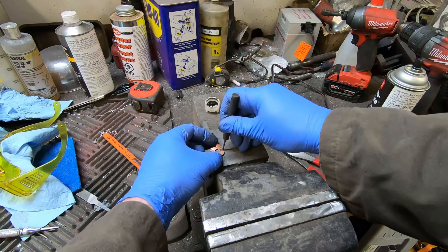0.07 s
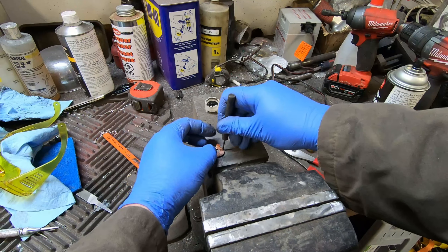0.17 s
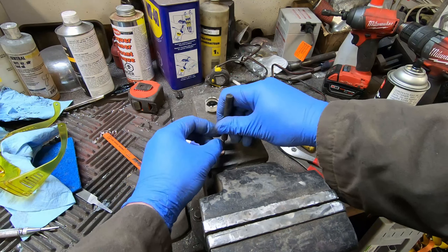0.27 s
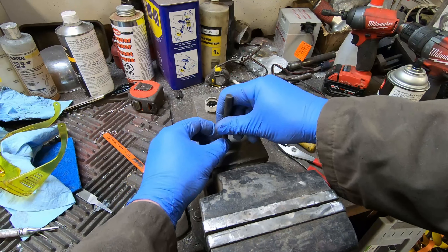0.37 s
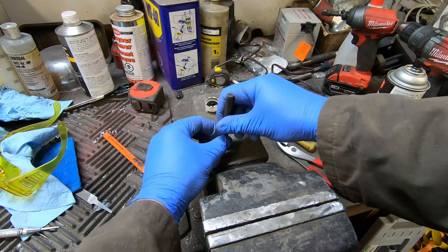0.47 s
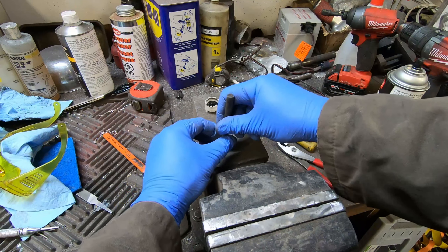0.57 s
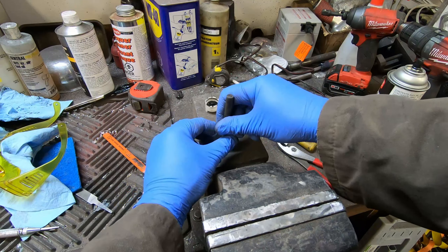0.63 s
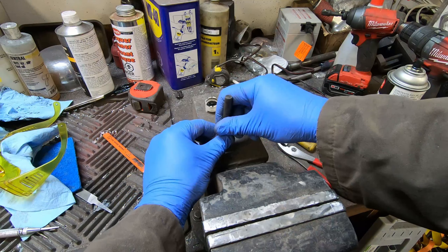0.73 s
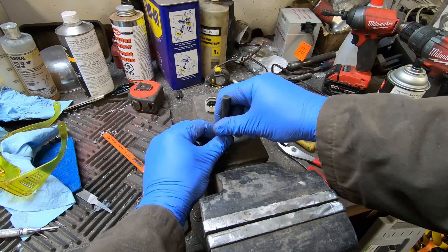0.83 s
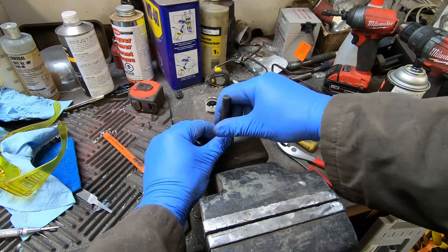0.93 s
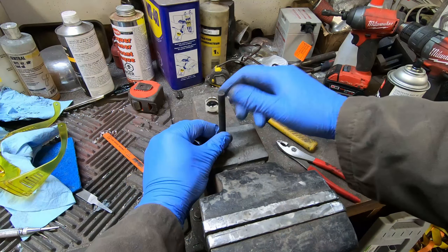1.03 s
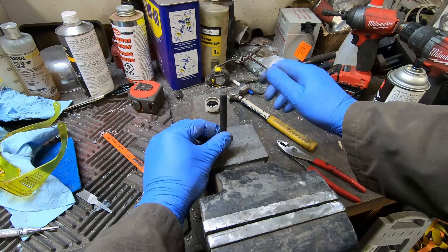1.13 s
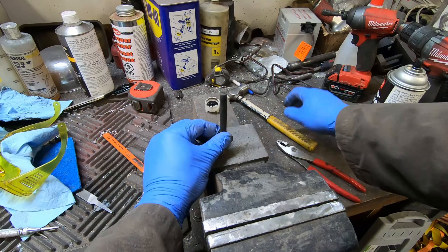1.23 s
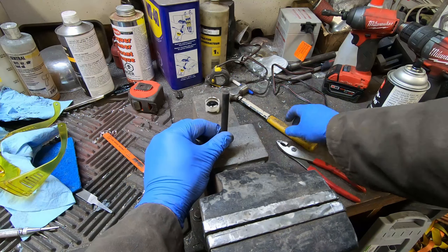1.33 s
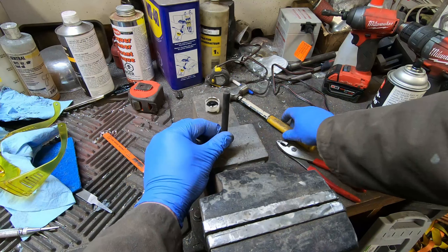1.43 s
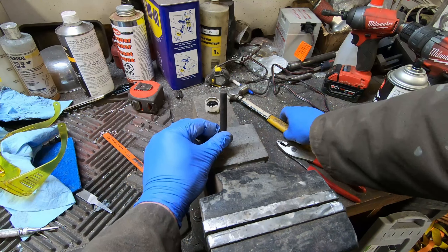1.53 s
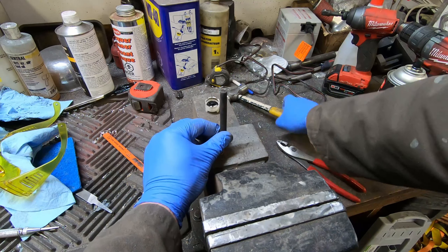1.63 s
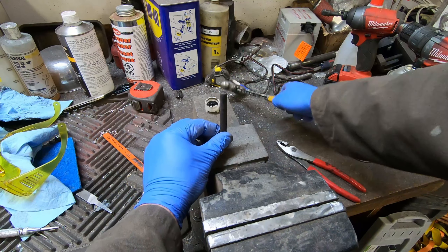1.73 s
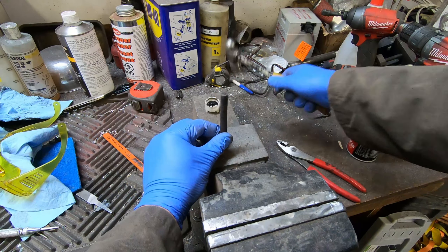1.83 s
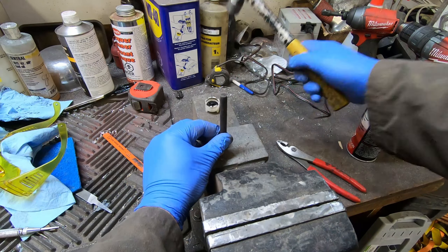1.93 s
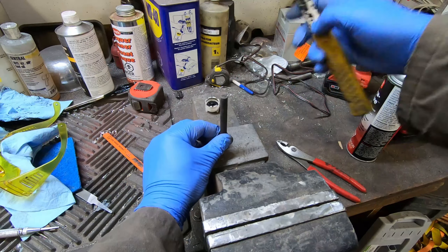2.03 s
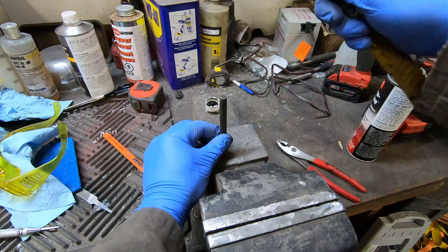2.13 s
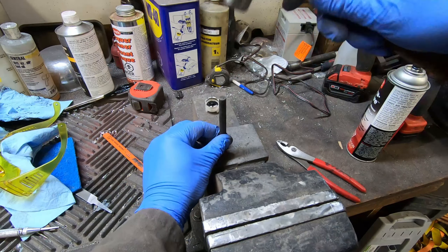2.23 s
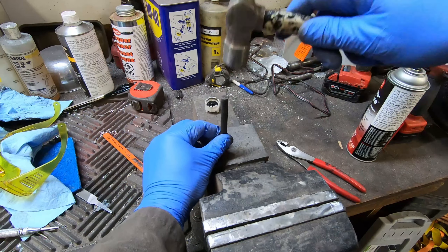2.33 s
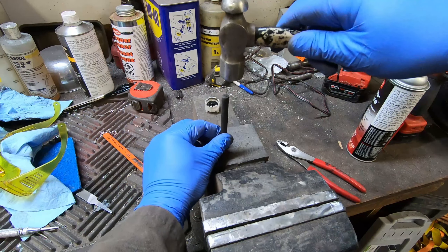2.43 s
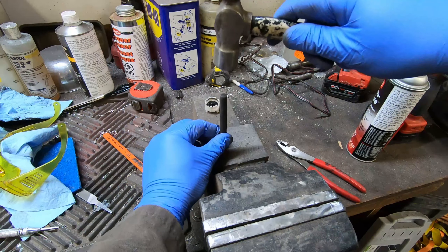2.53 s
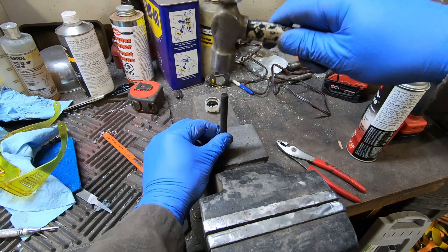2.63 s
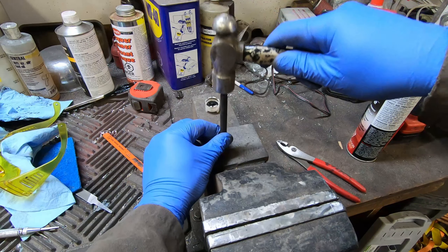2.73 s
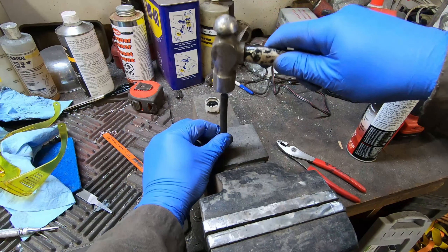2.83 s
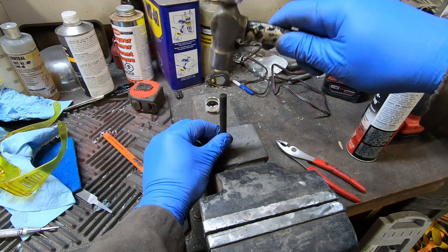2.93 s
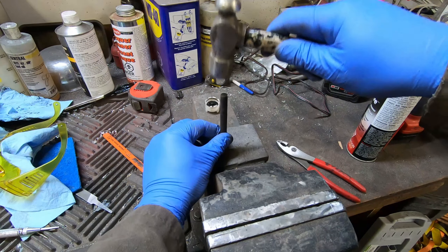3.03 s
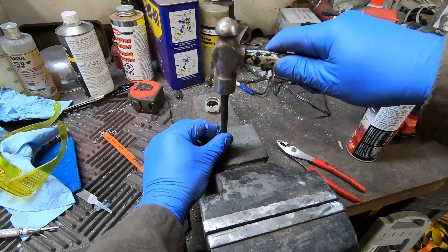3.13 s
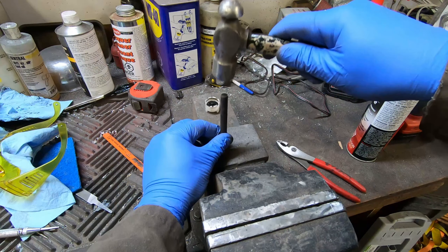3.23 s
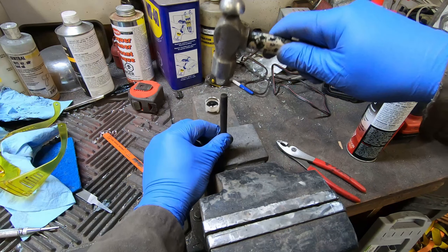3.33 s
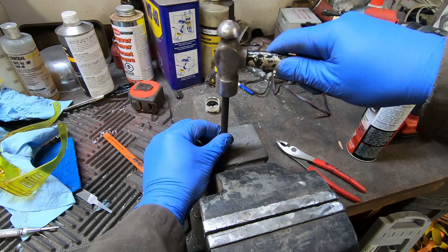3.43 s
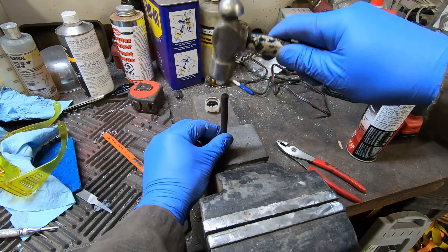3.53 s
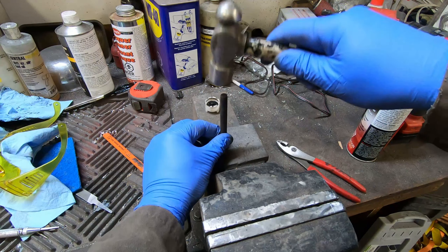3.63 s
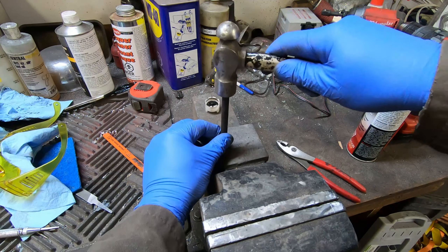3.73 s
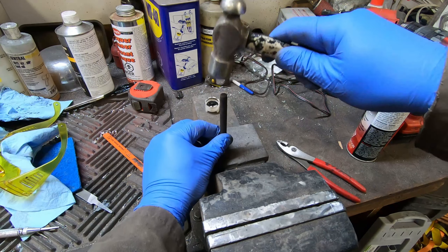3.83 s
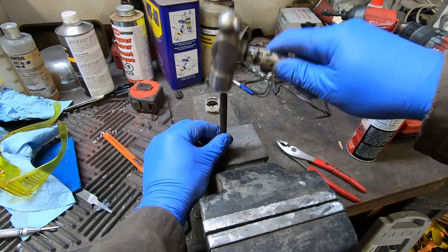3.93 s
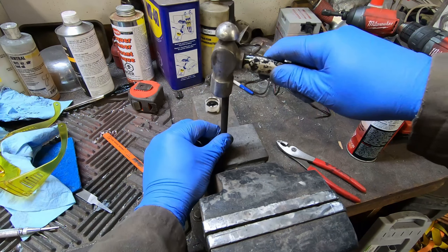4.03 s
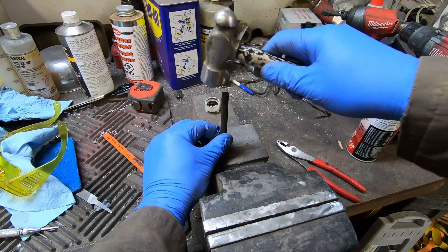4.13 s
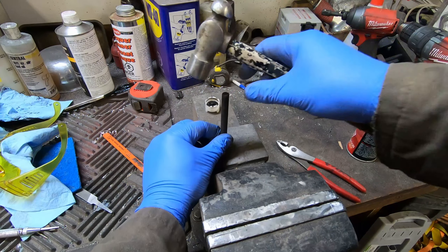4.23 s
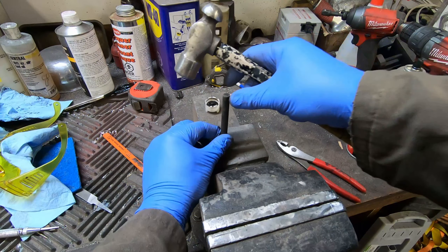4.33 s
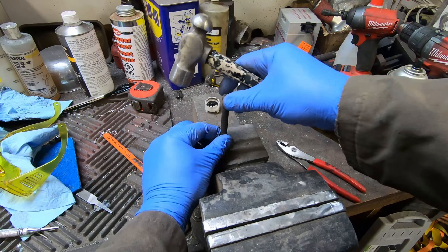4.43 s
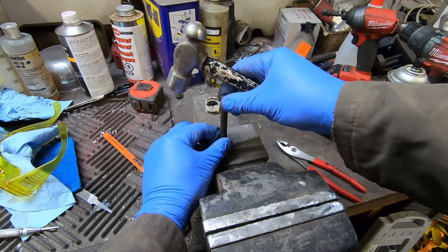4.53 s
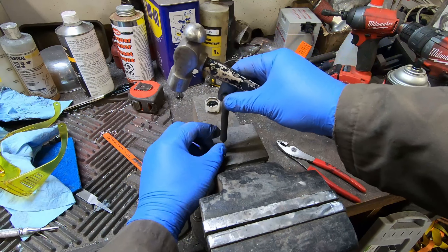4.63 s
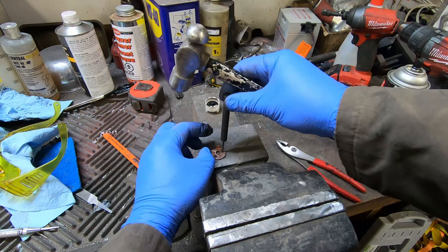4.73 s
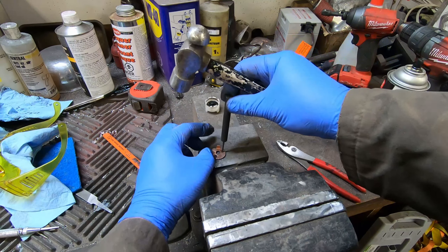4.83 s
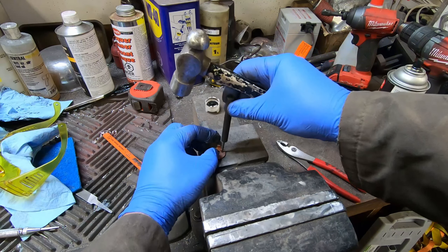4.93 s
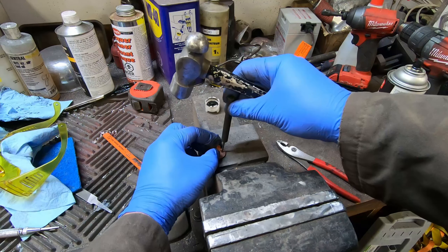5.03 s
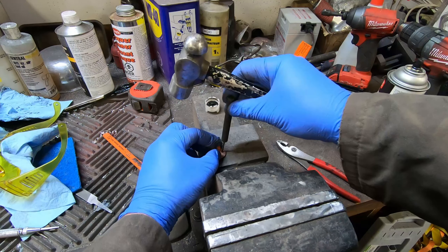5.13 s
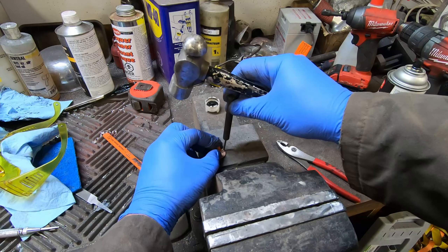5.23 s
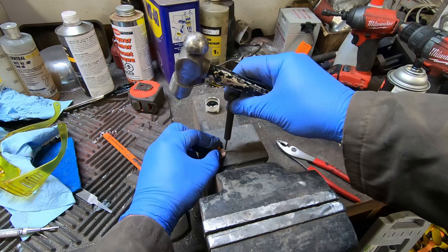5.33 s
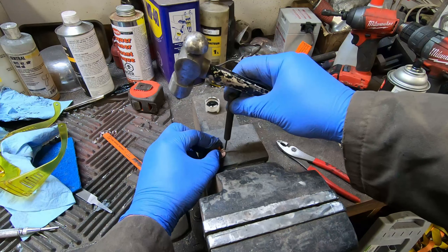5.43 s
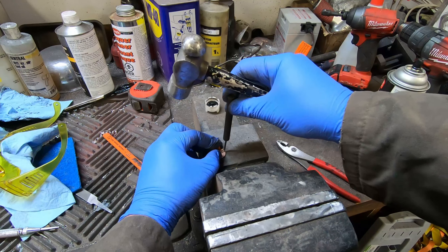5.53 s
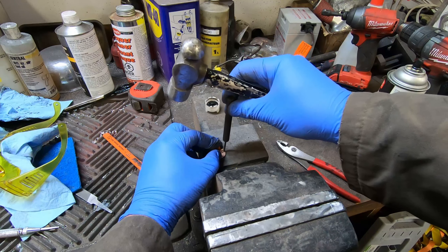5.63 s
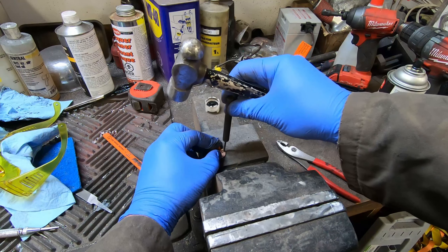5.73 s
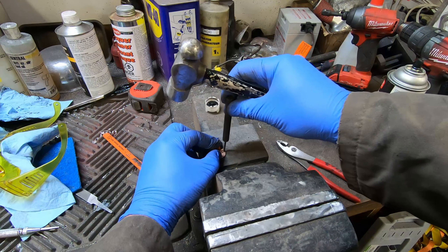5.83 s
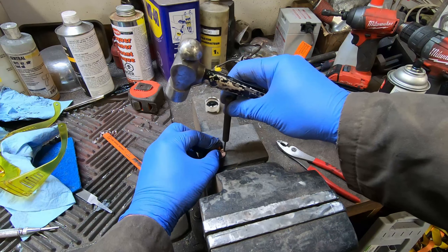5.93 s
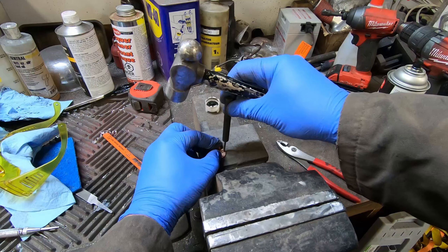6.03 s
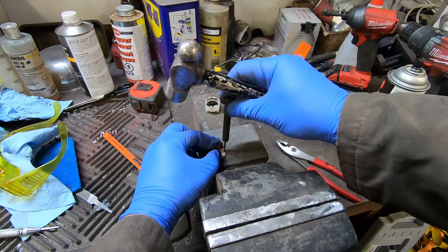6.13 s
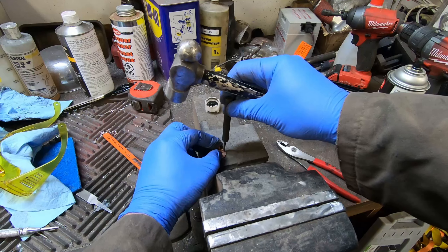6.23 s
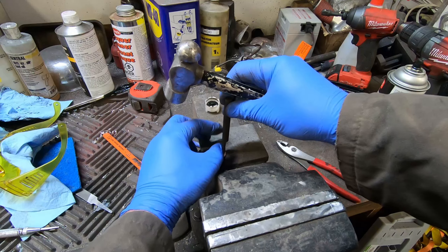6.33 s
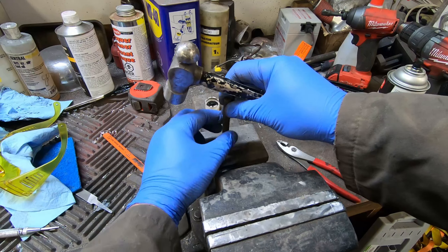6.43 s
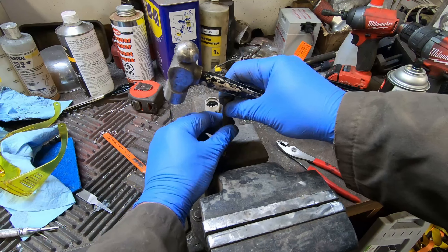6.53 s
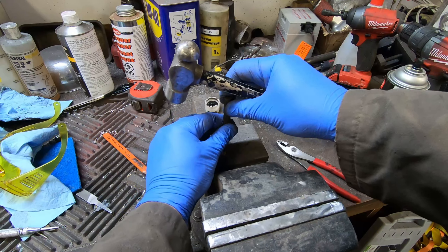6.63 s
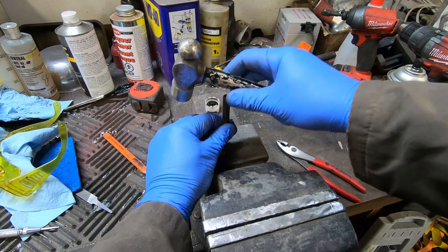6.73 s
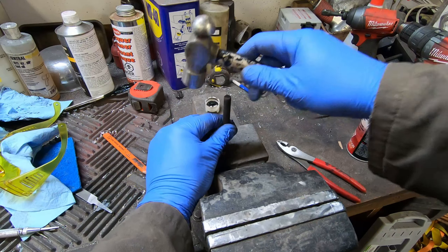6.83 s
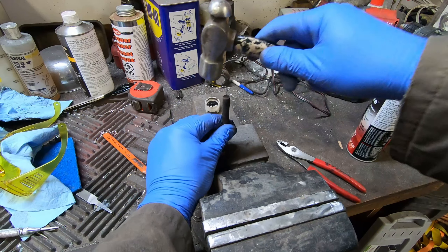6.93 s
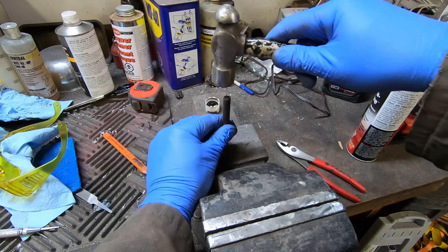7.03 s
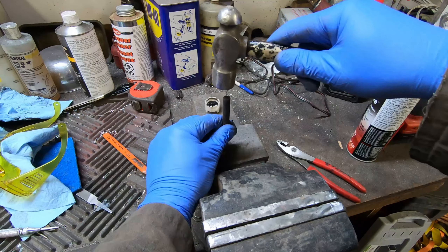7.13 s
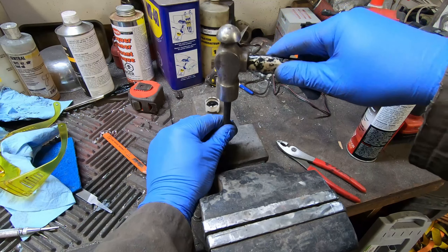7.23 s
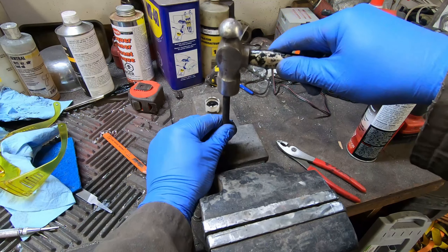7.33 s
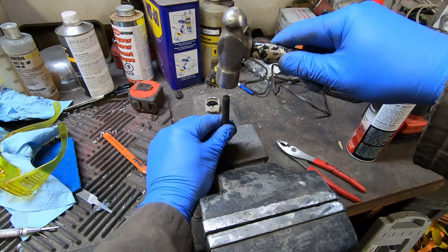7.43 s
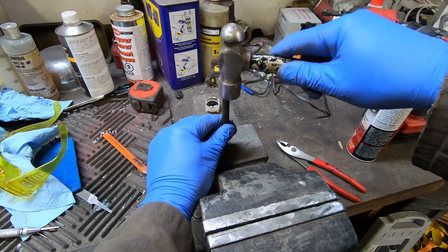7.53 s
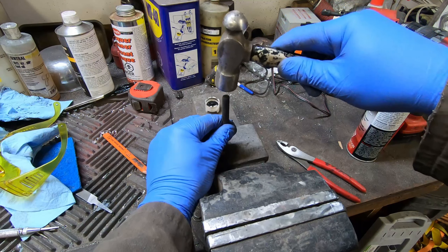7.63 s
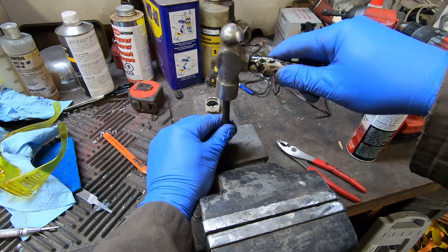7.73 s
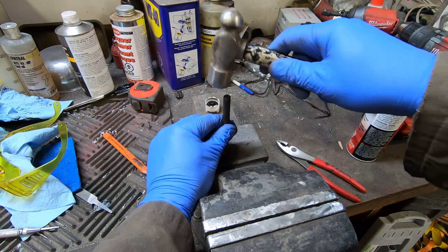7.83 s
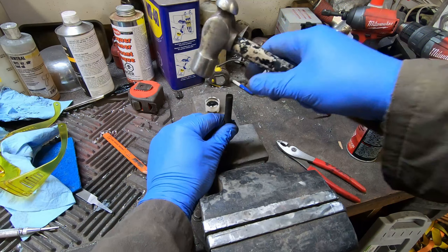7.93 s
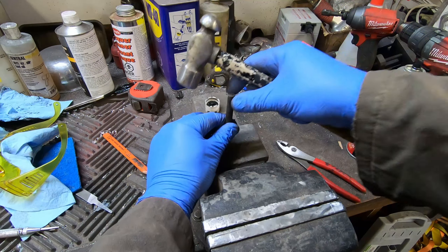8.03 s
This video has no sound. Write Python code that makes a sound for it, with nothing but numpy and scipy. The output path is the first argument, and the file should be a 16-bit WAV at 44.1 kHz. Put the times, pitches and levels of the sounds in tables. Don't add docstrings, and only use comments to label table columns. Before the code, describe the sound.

A close, mono workshop scene with low, quiet room tone and a barely audible high charger whine. From 0 to 1.5 seconds, small steel ticks, soft taps, rustling sleeves and a low murmur of arms on the bench. Around 1.6 to 1.9 a hammer drags off the bench, a short stuttering rumble with gritty hiss and catches; at 2.0 to 2.25 the handle slides faintly through a rubber glove. A light tap at 2.9 is followed by heavy blows at 3.2, 3.5, 3.8 and 4.1, the last with a tiny high rebound. Each is a bright steel crack with a solid bench thump, under a second of room answer and a faint distant sheet-metal hum. From 4.3 to 7.0, only fading hum, delicate clicks, dull touches and cloth rustle. Three more hard strikes land at 7.35, 7.6 and 7.85, ringing into the end.

```python
import sys
import numpy as np
from scipy import signal
from scipy.fft import rfft, irfft, next_fast_len
from scipy.io import wavfile
from scipy.ndimage import map_coordinates

SR = 44100
rng = np.random.default_rng(int(sys.argv[2]) if len(sys.argv) > 2 else 0)


def generate_wav(sig):
    pcm = np.round(np.clip(np.atleast_2d(sig).T, -1, 1) * 32767).astype(np.int16)
    wavfile.write(sys.argv[1], SR, pcm)


def attenuation_scalar(level_db):
    decades = np.asarray(level_db, float) / 20
    return 10 ** decades


N = 357165


def unit(x):
    return x / np.sqrt(np.mean(x ** 2) + 1e-20)


def add(track, s, x):
    part = track[round(s * SR):][:len(x)]
    part += x[:len(part)]


def along(points, hz):
    f, v = np.transpose(points)
    return np.interp(np.log(hz + 1), np.log(f + 1), v)


def coloured(x, spectrum):
    m = next_fast_len(len(x) + 8192)
    gain = attenuation_scalar(along(spectrum, np.fft.rfftfreq(m, 1 / SR)))
    return irfft(rfft(x, m) * gain, m)[:len(x)]


def wobble(rate):
    knots = rng.standard_normal(int(N * rate / SR) + 4)
    return map_coordinates(knots, [np.arange(N) * rate / SR])


def grainy(rate, spread_db, hiss):
    size_db = spread_db * np.minimum(rng.exponential(size=N), 2)
    clicks = (rng.random(N) < rate / SR) * attenuation_scalar(size_db) * rng.standard_normal(N)
    return unit(clicks) + hiss * rng.standard_normal(N)


def ring(modes, seconds, cycles, blur):
    t = np.arange(int(seconds * SR)) / SR
    hz, db, t60 = np.transpose(modes)[:, :, None]
    strength = attenuation_scalar(db + 2 * rng.standard_normal(hz.shape) - 60 * t / t60)
    drift = blur * np.cumsum(rng.standard_normal(strength.shape), axis=1)
    swell = (1 - np.exp(-t * hz / cycles)) ** 2
    return np.sum(strength * swell * np.sin(2 * np.pi * hz * t + drift), axis=0)


def packets(waves):
    t = np.arange(SR // 20) / SR
    hz, s, length, db = np.transpose(waves)[:, :, None]
    bell = attenuation_scalar(db) * np.exp(-.5 * ((t - s) / length) ** 2)
    groups = np.sum(bell * np.cos(2 * np.pi * hz * (t - s)), axis=0)
    return groups * np.minimum(t * 2000, 1)


def tail(colour, rise):
    # pitch_hz, t60_s
    shop_decay = [(60, .8), (160, 0.57), (420, 0.4), (1100, 0.42), (2900, 0.45), (7000, 0.33),
                  (10000, 0.18), (15000, 0.162)]
    hz, t, z = signal.stft(rng.standard_normal(SR * 3 // 4), SR, nperseg=256)
    decay = attenuation_scalar(-60 * t / along(shop_decay, hz)[:, None])
    answer = signal.istft(z * decay, SR, nperseg=256)[1]
    answer = coloured(np.pad(answer, (2000, 0)), colour)[2000:]
    answer = answer * np.minimum(np.arange(len(answer)) / (rise * SR), 1) ** 2
    return answer / np.linalg.norm(answer)


def stroke(start, rise, hold, fall, db, swing_db):
    s = start + np.cumsum([-.02, .02, rise, hold, fall, .02])
    t = np.arange(N) / SR
    swing = attenuation_scalar(db - swing_db * np.interp(t, s[1:5], [1, 0, 0, 1]))
    return swing * np.interp(t, s, [0, 1, 1, 1, 1, 0])


def swells(rows):
    t = np.arange(N) / SR
    return sum(attenuation_scalar(db) * np.exp(-((t - s) / half) ** 2) for s, db, half in rows)


def hammer():
    # start_s, thump_peak_db, then against the thump crack_db, head_ring_db
    blows = [
        (2.906, -14.5, -28.5, -29),
        (3.217, -1, -9, -15.5),
        (3.516, -0.5, -7.5, -13),
        (3.797, 1, -8, -15.5),
        (4.084, 0.5, -12.5, -39.5),
        (4.125, -14, -10, -25),
        (7.364, -5, -5, -28),
        (7.619, -2, -4, -24.5),
        (7.835, -1, -7.5, -41),
    ]
    # pitch_hz, level_db, t60_s
    lingering_notes = [(2184, 0.5, .45), (2315, -3.5, 0.21), (3740, -2.5, 0.35), (5300, -5, 0.25),
                       (6800, -4.5, 0.12), (8600, -3.5, 0.19)]
    # pitch_hz, level_db
    wall_colour = [(1500, -11.5), (2300, -6.5), (3750, -3.5), (6000, -7.5), (8500, -2.5), (11000, -2.5),
                   (14000, -3.5)]
    # pitch_hz, level_db per Hz
    boom_colour = [(21, -40.5), (35, -18), (64, -18), (112, -13), (145, -8), (183, -10.5), (234, 1.5),
                   (304, -3), (442, 0.5), (600, 2.5), (760, -1.5), (895, -4.5), (1070, -1.5), (1750, -19.5),
                   (2280, -51.5), (3850, -120)]
    # pitch_hz, level_db per Hz
    wash_colour = [(1000, -30), (1700, -4.5), (1900, -3), (2190, -6.5), (2870, -16), (3740, -12),
                   (4140, -14), (5700, -11.5), (6150, -17), (6690, -13.5), (8450, -8.5), (10800, -28),
                   (13300, -21), (16000, -37)]
    out = np.zeros(N)
    same_boom = tail(boom_colour, rise=0.0048)
    for s, db, crack_db, head_db in blows:
        bright_db = 0.9 * db
        steel = struck_steel(db, crack_db, head_db)
        add(out, s, attenuation_scalar(db) * steel)
        add(out, s, attenuation_scalar(db - 40 + bright_db) * ring(lingering_notes, .45, cycles=8, blur=.11))
        add(out, s, attenuation_scalar(db - 15.0) * signal.fftconvolve(steel, tail(wall_colour, rise=.004)))
        add(out, s, attenuation_scalar(db) * thumped_bench())
        boom = 1.016 * same_boom + .45 * tail(boom_colour, rise=0.0047)
        add(out, s, attenuation_scalar(db + 12.5) * boom)
        add(out, s, attenuation_scalar(db - 22 + bright_db + 16.5) * tail(wash_colour, rise=0.0034))
        add(out, s, attenuation_scalar(db - 53) * humming_shelf())
    return out


def struck_steel(db, crack_db, head_db):
    # pitch_hz, level_db, t60_s
    punch_modes = [(5570, -9, 0.0054), (6840, 2, 0.018), (7600, 0.5, 0.018), (8500, -6.5, 0.048),
                   (9220, -3, 0.0066)]
    # pitch_hz, level_db, t60_s
    head_modes = [(10900, -12, .01), (12980, 5, 0.013), (14405, -5, .012), (15300, -14, .012)]
    # pitch_hz, level_db, t60_s
    block_modes = [(2214, -0.5, 0.091), (2316, -5, 0.023), (2860, -3.5, 0.016), (3757, -3, 0.047),
                   (4686, 2.5, 0.018)]
    t = np.arange(SR // 20) / SR
    hit = np.zeros(SR // 6)
    block_db = -18.5 + 0.48 * db
    contact = np.diff(rng.standard_normal(len(t) + 1))
    add(hit, 0, attenuation_scalar(crack_db - 6.0) * ring(punch_modes, 0.079, cycles=0.5, blur=0.21))
    add(hit, 0, attenuation_scalar(crack_db - 7.0 - 60 * t / 0.0035) * contact)
    add(hit, 0, attenuation_scalar(head_db) * ring(head_modes, 0.3, cycles=2, blur=.17))
    add(hit, 0, attenuation_scalar(block_db - 1.5) * ring(block_modes, .1, cycles=1.0, blur=0.22))
    return hit


def thumped_bench():
    # pitch_hz, arrival_s, length_s, level_db
    bending_waves = [(1400, .002, .0008, -13), (1000, .0053, .0018, 0), (700, .0083, .0016, -12),
                     (290, .0123, .003, -8.5), (480, .0095, .0025, -13), (1150, .0165, .002, -11)]
    # pitch_hz, level_db, t60_s
    bench_modes = [(240, -25, 0.11), (358, -16, .1), (400.4, -21, 0.29), (461, -21, 0.31),
                   (539.2, -14, 0.099), (594, -10.5, 0.031), (689, -27, .1), (814.6, -15, 0.1),
                   (887, -14, .08), (980, -22, 0.02), (1363, -30, 0.11), (1462, -29, 0.095),
                   (1656, -42, 0.11), (1790, -42, .1)]
    # pitch_hz, level_db, t60_s
    leg_modes = [(48.5, -23, .55), (124.5, 3, .2)]
    thump = np.zeros(SR)
    add(thump, 0, attenuation_scalar(-1.5) * packets(bending_waves))
    add(thump, .003, attenuation_scalar(3.0) * ring(bench_modes, 0.78, cycles=0.5, blur=.03))
    add(thump, 0.005, attenuation_scalar(-20) * ring(leg_modes, .8, cycles=0.5, blur=0))
    return thump


def humming_shelf():
    # pitch_hz, level_db, t60_s
    shelf_modes = [(377, -12, 2), (468, 4, 2.6), (651, -24, 4), (743, -19, 9), (899, -15, 4),
                   (1001, -22, 5), (1175, -15, 5)]
    return ring(shelf_modes, 3, cycles=12, blur=0)


def drag():
    # start_s, rise_s, hold_s, fall_s, level_db
    drag_stroke = (1.63, .105, .10, .11, -28.5)
    # pitch_hz, level_db per Hz
    rumble_colour = [(35, -78), (60, -91), (123, 10.5), (209, -2), (237, -12), (295, 9.5), (348, 0),
                     (484, 2), (673, -11), (1020, -5), (1600, -23.5), (2080, -62), (3520, -120)]
    # pitch_hz, level_db per Hz
    grit_colour = [(710, -34), (1200, -1.5), (1700, -11.5), (2430, -6), (3150, -12.5), (5710, -15.5),
                   (10700, -31), (16000, -42)]
    # start_s, peak_db
    catches = [(1.6433, -39), (1.6905, -43), (1.708, -32.5), (1.7335, -32), (1.746, -38), (1.7962, -29.5),
               (1.811, -26), (1.8344, -46), (1.8694, -62)]
    start, *shape, db = drag_stroke
    slips = attenuation_scalar(1.8 * wobble(45)) * grainy(350, spread_db=1, hiss=1.1)
    body = unit(coloured(slips, rumble_colour))
    grit = unit(coloured(grainy(2500, spread_db=-5, hiss=0.85), grit_colour))
    push = stroke(start + 0.0067, *shape, db - 14.5 - 8, swing_db=28) * attenuation_scalar(3 * wobble(40))
    t = np.arange(SR // 8) / SR
    for s, catch_db in catches:
        add(push, s, attenuation_scalar(catch_db - 10 - 60 * t / 0.063) * np.minimum(t / .002, 1))
    return stroke(*drag_stroke, swing_db=30) * body + push * grit


def slide():
    # start_s, rise_s, hold_s, fall_s, level_db
    slides = [
        (2.026, 0.034, 0.029, 0.02, -54.5),
        (2.117, 0.019, 0.086, 0.032, -46),
    ]
    # open_hz, closed_hz, closing_start_s, closing_length_s, level_db against the hiss
    hand_hollows = [
        (2550, 2450, 2.06, .05, -4),
        (6000, 2900, 2.2, .015, -9),
    ]
    # pitch_hz, level_db per Hz
    rubber_colour = [(1180, -35), (2000, -14), (2910, -13), (3740, -9.5), (4050, -10), (6040, -3),
                     (14200, -9.5), (16000, -28.5)]
    rubber = unit(coloured(grainy(6800, spread_db=-3.0, hiss=0.93), rubber_colour))
    hiss = attenuation_scalar(1.5 * wobble(44) - 2.5) * rubber
    flutter = unit(wobble(2000))
    out = np.zeros(N)
    for row, (open_hz, closed_hz, s, takes, db) in zip(slides, hand_hollows):
        hand_hz = np.interp(np.arange(N) / SR, [s, s + takes], [open_hz, closed_hz])
        hollow = flutter * np.sin(2 * np.pi * np.cumsum(hand_hz) / SR)
        out += stroke(*row, swing_db=15.5) * (hiss + attenuation_scalar(db) * hollow)
    return out


def touches():
    # start_s, peak_db, pitch_hz
    ticks = [(0.1015, -51, 3120), (0.5432, -48, 2620), (1.102, -36, 3300), (1.1528, -38, 6900),
             (1.9044, -40, 2400), (2.2997, -36, 5300), (2.3374, -44, 5150), (2.4394, -56, 4380),
             (2.7816, -47, 2920), (4.2935, -33, 5100), (4.352, -44, 2173), (4.665, -48, 2430),
             (4.7434, -48, 2466), (4.762, -47, 5400), (4.7684, -39, 4300), (4.777, -41, 4600),
             (4.783, -55, 5600), (4.79, -50, 1710), (4.798, -45, 2440), (5.1587, -48, 4643),
             (5.1896, -46, 2085), (5.412, -50, 4300), (5.74, -53, 4600), (5.5502, -55, 5880),
             (6.2761, -45.5, 4810), (6.39, -41, 5400), (6.7498, -43, 3840), (6.9256, -43, 4800),
             (1.525, -36, 8360), (1.6125, -58, 8500), (4.0862, -19.5, 14580), (4.095, -29.5, 14700),
              (4.1253, -17, 5230),
             (0.034, -43, 1070), (0.137, -41, 1260), (0.146, -42, 1390), (4.3555, -45.5, 1317),
            (5.1891, -51.5, 1185), (5.11, -55.5, 1080)]
    # start_s, peak_db, pitch_hz, length_s
    knocks = [(0.138, -56, 805, 0.0028), (1.323, -31, 430, 0.00099), (1.647, -29.5, 325, 0.00393),
              (1.749, -21.5, 340, 0.0036), (2.724, -51, 204, 0.0038), (4.726, -48, 900, 0.00083),
              (4.685, -56, 948, 0.0013), (5.771, -53.5, 340, .007)]
    out = np.zeros(N)
    for s, db, hz in ticks:
        modes = [(hz, 0, 14 / hz), (min(1.5 * hz, 16000), -5, 11 / hz), (.65 * hz, -6, 7 / hz)]
        add(out, s, attenuation_scalar(db + 1.5) * ring(modes, .03, cycles=1, blur=.04 + hz / 40000))
    for s, db, hz, length in knocks:
        waves = [(hz, 1.55 * length, length, 0),
                 (2.8 * hz, 1.23 * length, 0.12 * length, -5),
                 (2.3 * hz, 0.244 * length, 0.78 * length, -10)]
        add(out, s, attenuation_scalar(db) * packets(waves))
    return out


def moves():
    # time_s, level_db
    effort = [(0, -67.5), (.23, -61), (.3, -65), (.84, -67), (1.1, -64), (1.34, -56), (1.56, -57),
              (1.98, -56.5), (2.05, -62.5), (2.43, -59), (2.57, -68.5), (4.4, -63), (4.8, -64.5),
              (4.88, -68.5), (6.5, -71.5), (6.6, -64), (6.85, -64.5), (7.28, -68.5)]
    # pitch_hz, level_db per Hz
    murmur_colour = [(71, -29), (120, -5.5), (274, -3), (403, -5), (574, -9), (1050, -12.5), (2000, -21),
                     (2600, -49.5), (4400, -120)]
    # middle_s, level_db, half_length_s
    leans = [(.034, -69, 0.026), (.29, -79, 0.13), (1.36, -83, 0.16), (1.6, -62.5, .1), (1.95, -74, .05),
             (2.67, -65, 0.039), (2.86, -74, 0.2), (4.82, -73, 0.19), (5.65, -73, 0.25), (6.33, -67, 0.074),
             (6.56, -66.5, 0.12), (7.0, -68.5, .3)]
    # pitch_hz, level_db per Hz
    lean_colour = [(35, -33), (60, -3), (110, 7), (160, -5), (250, -31.5)]
    # middle_s, level_db, half_length_s
    rustles = [(.226, -67, 0.023), (.45, -72, 0.14), (.65, -77, 0.012), (1.075, -62, 0.013),
               (1.13, -65.5, 0.04), (1.3, -71, 0.013), (4.79, -68, 0.032), (5.19, -74, 0.017),
               (6.28, -79, .02), (6.385, -66.5, 0.023), (6.8, -74.5, 0.14)]
    # pitch_hz, level_db per Hz
    sleeve_colour = [(530, -24), (900, -8), (1130, -11.5), (1600, -13), (2860, -11), (6720, -16.5),
                     (11400, -23), (16000, -38.5)]
    effort_db = np.interp(np.arange(N) / SR, *np.transpose(effort))
    extra_db = effort_db + 65
    murmur_gain = attenuation_scalar(effort_db - 1.0 + 2.0 * wobble(5.4))
    murmur = murmur_gain * unit(coloured(rng.standard_normal(N), murmur_colour))
    boom_gain = (attenuation_scalar(-76.5 + 0.24 * extra_db) + swells(leans)) * attenuation_scalar(0.82 * wobble(8.1))
    boom = boom_gain * unit(coloured(rng.standard_normal(N), lean_colour))
    cloth_gain = (attenuation_scalar(-73 + 1.2 * extra_db) + swells(rustles)) * attenuation_scalar(2.2 * wobble(20))
    cloth = cloth_gain * unit(coloured(grainy(1200, spread_db=5.0, hiss=1.8), sleeve_colour))
    return murmur + boom + cloth


def still_air():
    # pitch_hz, level_db per Hz
    quiet_colour = [(15, -35), (25, 5.5), (358, -2.5), (600, -10.5), (746, -8.5), (809, -12), (1680, -16),
                    (5420, -14.5), (15200, -22), (16500, -45)]
    return attenuation_scalar(-63.5 - 5.0) * unit(coloured(rng.standard_normal(N), quiet_colour))


def charger():
    # pitch_hz, level_db
    whine_tones = [(5335, -91)]
    t = np.arange(N) / SR
    return sum(attenuation_scalar(db + 3) * np.sin(2 * np.pi * hz * t) for hz, db in whine_tones)


def scene():
    handling = drag() + slide() + touches() + moves()
    return (hammer() + handling + still_air() + charger())[None]


def top_cut(x):
    return signal.sosfilt(signal.butter(12, 17100, fs=SR, output="sos"), x)


def record(dry):
    # pitch_hz, level_db
    band_edges = [(18, -22), (42, 0), (15000, 0), (16200, -10), (17000, -30), (17200, -80)]
    soft = dry / (1 + np.abs(dry / .95) ** 5) ** (1 / 5)
    mix = coloured(soft[0], band_edges)[None]
    return top_cut(mix)


dry = scene()
out = record(dry)
generate_wav(out)
```